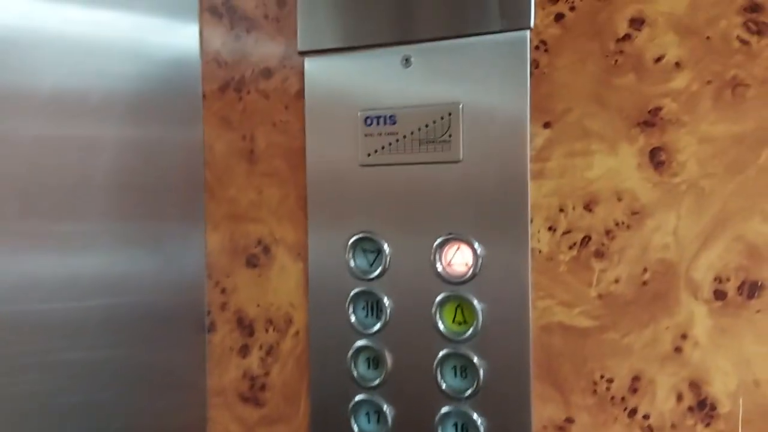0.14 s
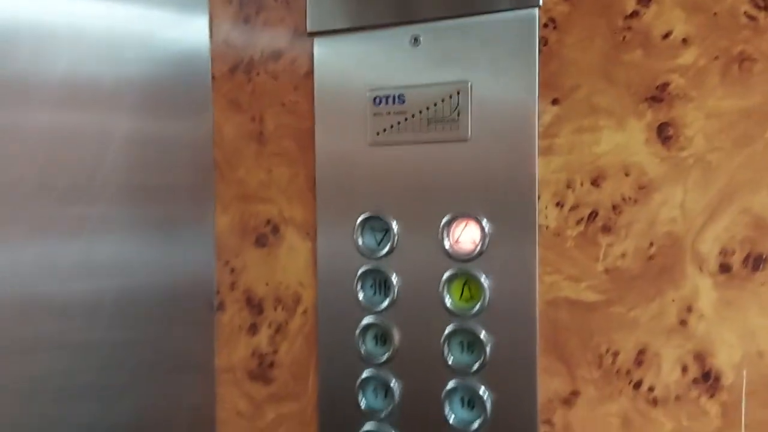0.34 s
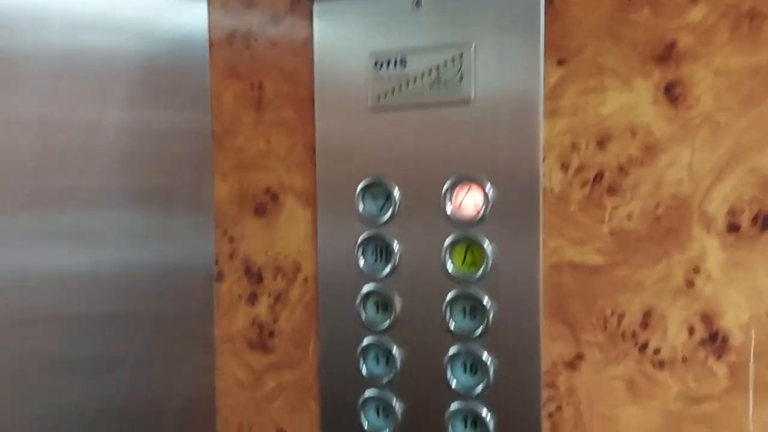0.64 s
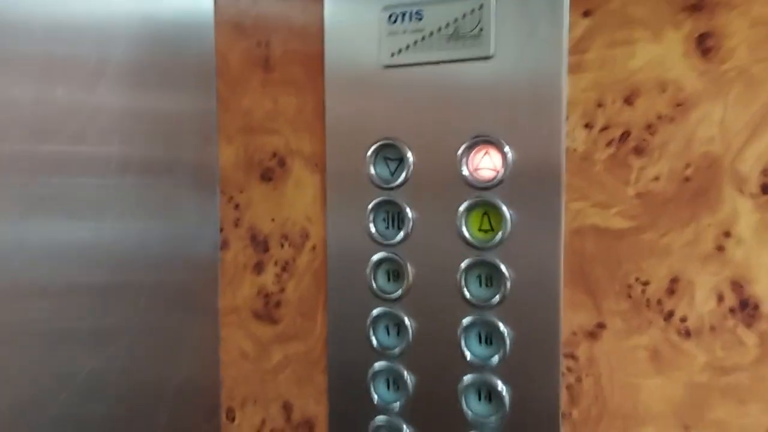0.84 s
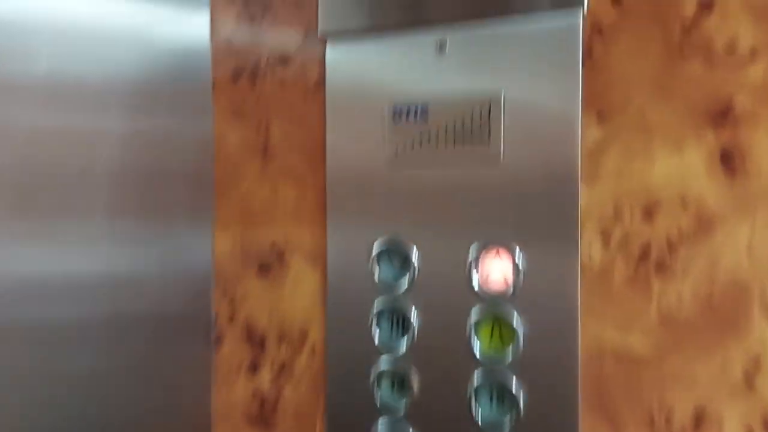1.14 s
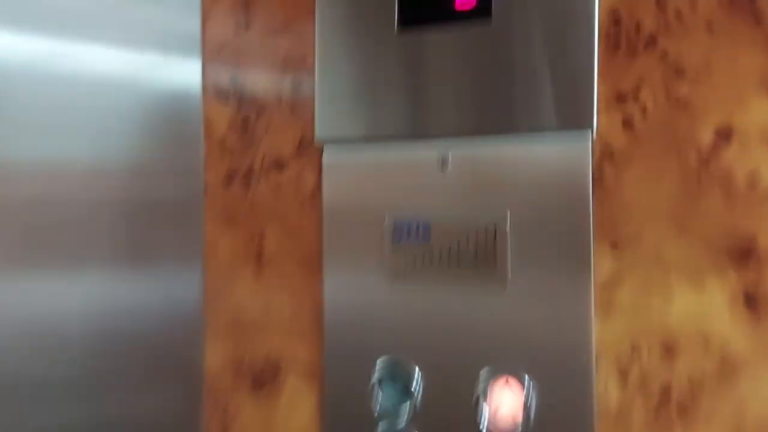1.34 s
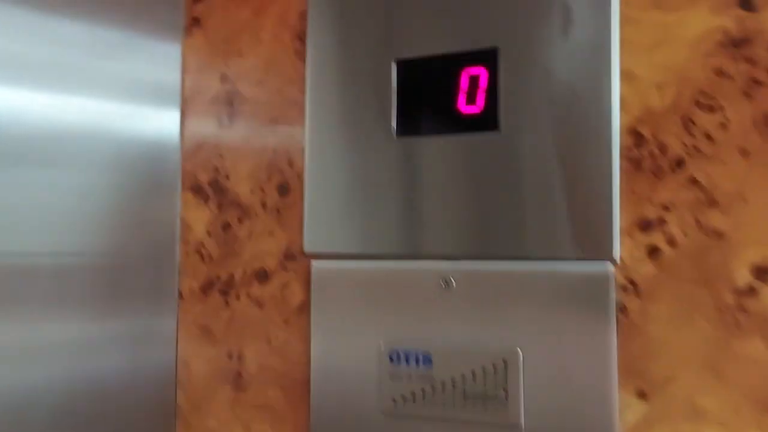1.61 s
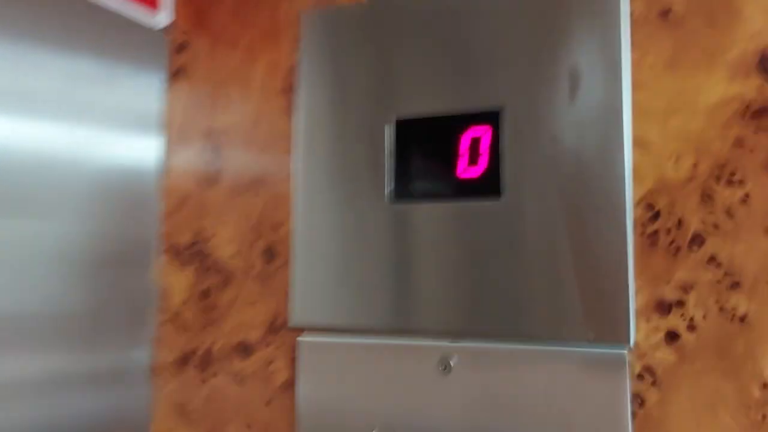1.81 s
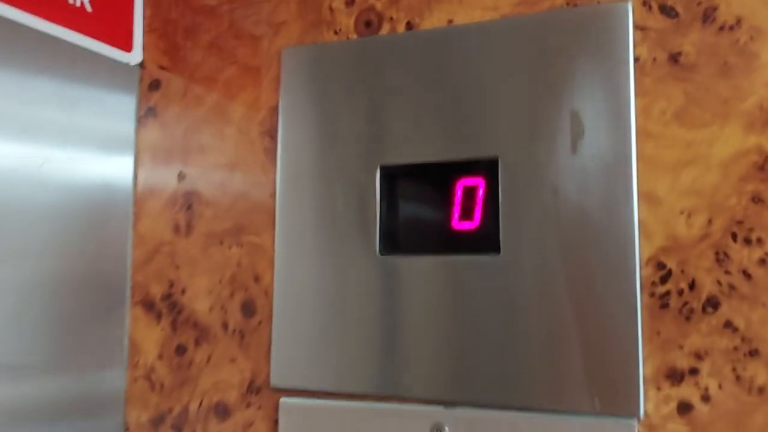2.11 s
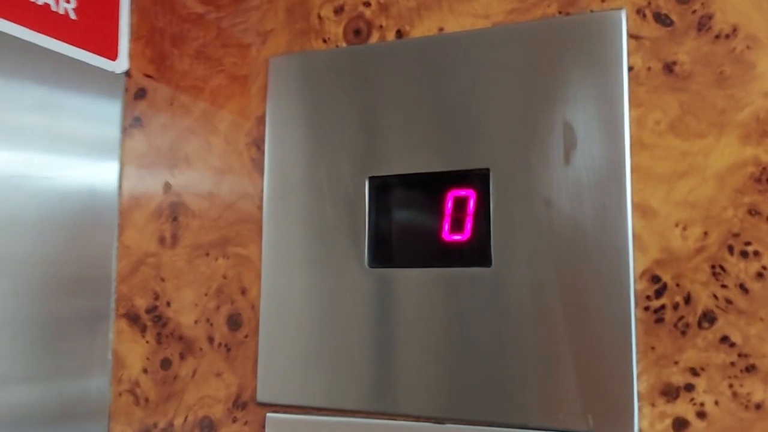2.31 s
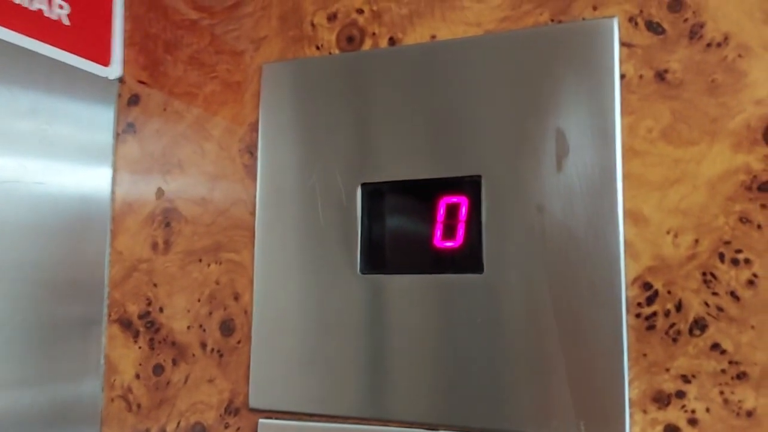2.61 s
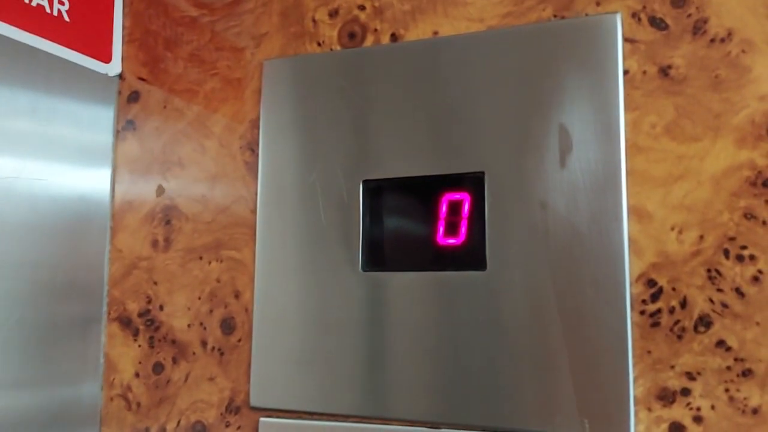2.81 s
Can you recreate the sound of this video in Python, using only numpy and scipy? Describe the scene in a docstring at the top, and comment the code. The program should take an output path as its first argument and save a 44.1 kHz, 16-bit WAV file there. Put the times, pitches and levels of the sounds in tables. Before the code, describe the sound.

Elevator starting, heard inside: strong buzzing hum stops abruptly, dull jolt and slide, then quiet deep drive tone

```python
"""Small elevator car setting off

Recorded inside the car, in stereo: a door magnet hums at twice the mains frequency and its panels buzz along.
The door gear creaks, a small metal part ticks, then the magnet cuts out as low-passed clicks jolt the cabin.
Coloured noise slides for a third of a second; a swept sine with its orders is the rising drive tone.
The guides rumble as noise through the low cabin modes; a short bright swish of noise passes later."""
import sys
import numpy as np
from scipy import signal
from scipy.io import wavfile

SR = 44100
rng = np.random.default_rng(int(sys.argv[2]) if len(sys.argv) > 2 else 0)


def master(y):
    """Save y as 16-bit WAV."""
    cut = np.clip(np.atleast_2d(y).T, -1, 1)
    pcm = np.round(cut * 32767)  # scale
    wavfile.write(sys.argv[1], SR, pcm.astype(np.int16))


def level_to_linear(level):
    """Convert decibel levels to linear amplitude factors, elementwise."""
    exponent = np.asarray(level, float) / 20
    return 10 ** exponent


N = 130095  # length in samples

# Likeness of the two microphone channels in the noises. Each row: frequency in Hz, correlation from -1 to 1.
CHANNEL_LIKENESS = [(60, 1.0), (130, 0.44), (290, 0.19), (640, 0.7), (1410, -0.5), (3100, 0.051),
                    (6820, -0.12), (15000, -0.092)]
# Lean of the noises across the stereo image. Each row: frequency in Hz, left minus right in dB.
CHANNEL_LEAN = [(60, 0.0), (130, 3), (290, -11), (640, 1.5), (1410, -6), (3100, -7), (6820, -1), (15000, 4)]
# Spectrum of the steady microphone hiss. Each row: frequency in Hz, relative density in dB per Hz.
MIC_HISS_COLOUR = [(6000, -2.5), (10000, -7.5), (14000, -10), (17000, 5)]
# Course of the treble hiss. Each row: time in seconds, level in dB.
TREBLE_LEVEL = [(0, -79.5), (0.15, -74), (0.36, -79), (0.38, -65.5), (0.56, -81.5), (0.582, -65.5),
                (0.75, -65), (0.9, -67), (1.0, -80), (1.2, -79), (1.32, -88), (1.6, -74), (1.9, -71),
                (2.05, -71.5), (2.2, -72.5), (2.36, -78), (2.85, -83.5), (2.95, -75)]
# Spectrum of the treble hiss. Each row: frequency in Hz, relative density in dB per Hz.
TREBLE_SPECTRUM = [(5000, -20.5), (6000, -4), (7500, -3.5), (9500, -3), (12000, -3), (14500, -1.5),
                   (16500, -3.5)]
# Course of the mechanism's rattle. Each row: time in seconds, level in dB.
RATTLE_LEVEL = [(0.03, -45.5), (0.12, -44.5), (0.23, -43), (0.35, -51), (0.38, -40), (0.6, -50.5),
                (0.73, -38.5), (0.78, -46), (0.82, -43.5), (1.07, -76), (1.24, -63.5), (1.3, -78.5),
                (2.19, -52.5), (2.39, -62.5), (2.71, -52.5), (2.72, -62.5), (2.93, -54.5)]
# Spectrum of the mechanism's rattle. Each row: frequency in Hz, relative density in dB per Hz.
RATTLE_SPECTRUM = [(150, -45), (250, -7.5), (327, 2), (366, -5), (545, -3.5), (775, -8), (993, -18.5),
                   (1250, -16), (1500, -22.5), (1950, -48)]
# Sudden dull bursts: small knocks and sharp onsets of the rush. Each row: start in seconds, level in dB before
# scatter.
SUDDEN_BURSTS = [(.543, -60.5), (.574, -53), (1.189, -64), (1.535, -66.5), (1.615, -60), (1.78, -59),
                 (2.024, -78), (2.753, -68)]
# Short notes of the door gear. Each row: centre in seconds, pitch there in Hz, level in dB, length in seconds.
DOOR_CREAKS = [(0.055, 870, -45, 0.04), (0.157, 1175, -49, 0.018), (0.317, 1094, -56, 0.018),
               (0.805, 1050, -50, .03)]
# A metal tick and its bounces. Each row: start in seconds, relative strength in dB.
METAL_TICKS = [(0.3655, -47), (0.386, -51), (0.409, -57)]
# Modes of the small metal part. Each row: frequency in Hz, relative level in dB, 60 dB decay in seconds.
METAL_MODES = [(6080, -5, 0.01), (8120, 2, 0.016), (9100, -6, 0.008), (9700, -5, 0.008),
               (11600, -12, 0.007), (13400, -9, .01), (14200, -10, 0.01)]
# Spectrum of the swish. Each row: frequency in Hz, relative density in dB per Hz.
SWISH_SPECTRUM = [(5500, -15.5), (6800, -4), (8500, -10), (10300, -9), (12500, -6.5), (14500, -6.5),
                  (16500, -1)]
# Sliding and air rush. Each row: time in seconds, level of the body in dB, level of the upper part in dB.
RUSH_LEVELS = [(0.06, -52.5, -72.5), (0.11, -58, -71), (0.35, -62, -68.5), (0.399, -53, -66.5),
               (0.531, -67, -69.5), (0.583, -55, -60), (0.71, -48.5, -55), (0.89, -54.5, -59.5),
               (1.02, -71.5, -74), (1.16, -70.5, -69.5), (1.2, -62, -68), (1.3, -81.5, -84.5),
               (1.5, -71.5, -73.5), (1.55, -66.5, -70.5), (1.63, -66, -73), (1.69, -65.5, -68.5),
               (1.99, -65.5, -67), (2.05, -58, -64), (2.12, -57, -58), (2.25, -59.5, -68.5),
               (2.39, -64, -76.5), (2.68, -57.5, -72), (2.768, -64, -82), (2.929, -56.5, -64)]
# Spectrum of the rush before its two parts are levelled. Each row: frequency in Hz, density in dB per Hz.
RUSH_SPECTRUM = [(900, 0), (1200, -5.5), (1430, -4), (1850, -1.5), (2250, -6.5), (2600, -11), (3100, -14.5),
                 (4500, -11), (6400, -20), (8000, -30)]
# Panels buzzing along with the magnet. Each row: frequency in Hz, width of one pass in Hz, relative level in dB.
PANEL_BUZZ = [(335, 40, -4), (770, 35, -8), (890, 40, -14), (1270, 40, -14), (2130, 90, -19)]
# Course of the magnet's hum, the last row its end. Each row: time in seconds, level in dB.
MAGNET_HUM = [(0.0, -15.5), (0.422, -17.5), (0.458, -12.5), (0.478, -21), (0.53, -55)]
# Third order of the drive shaft. Each row: time in seconds, frequency in Hz before waver, level in dB.
DRIVE_THIRD_ORDER = [(1.35, 59.93, -54), (1.56, 61.83, -41.5), (1.73, 67.54, -35.5), (1.93, 69.13, -34),
                     (2.05, 71, -36), (2.15, 72.97, -45), (2.4, 70.22, -41), (2.52, 71.34, -34),
                     (2.7, 72.65, -33), (2.74, 69.37, -39), (2.85, 71.1, -29), (2.95, 72.45, -40)]
# Other orders of the shaft. Each row: order number, level in dB once faded in, spread of its waver in dB.
DRIVE_OTHER_ORDERS = [(2, -41, 1.5), (4, -46, 2.5), (5, -53, 2.5)]
# Soft blows to the car. Each row: start in seconds, click strength in dB, hardness as a low-pass in Hz.
CAR_JOLTS = [(0.499, -29, 300), (0.535, -16.5, 100), (0.574, -28, 200), (0.592, -19, 80), (0.645, -33, 250)]
# Low modes of the cabin. Each row: frequency in Hz, gain under jolts in dB, gain under rumble in dB,
# 60 dB decay under rumble in seconds.
CABIN_MODES = [(45.4, 0.5, 2, 0.17), (71, 9, -6.5, 0.41), (95.7, -34.5, -2, 0.34), (117.2, -21, -7.5, 0.6),
               (148.9, 3, -8.5, .3), (174, -4.5, -12, 0.46), (235, -20.5, -14.5, 0.26),
               (287.8, -27, -19.5, 0.26), (490.5, 6.5, -23.5, 0.09)]
# Shaking of the modes above the lowest, before a common gain. Each row: time in seconds, level in dB.
UPPER_SHAKING = [(0.0, -45), (0.47, -41.5), (0.51, -34.5), (0.69, -38.5), (0.85, -37.5), (1.12, -57.5),
                 (1.19, -51.5), (1.24, -61), (1.85, -49.5), (2.23, -41.5), (2.42, -51), (2.46, -42.5),
                 (2.95, -43.5)]
# Shaking of the lowest mode, before that mode's own gain. Each row: time in seconds, level in dB.
LOWEST_SHAKING = [(0, -49), (0.5, -50.5), (0.6, -26.5), (0.85, -52.5), (1.09, -50.5), (1.5, -49),
                  (2.95, -57)]

OPPOSITE = np.array([[1], [-1]])  # puts a side signal into left and, inverted, into right


def rms_one(x):
    """Scale to rms 1."""
    return x / np.sqrt(np.mean(x ** 2) + 1e-20)


def in_time(rows):
    """Columns of a curve, one value per sample."""
    s, *columns = np.transpose(rows)
    return [np.interp(np.arange(N) / SR, s, c) for c in columns]


def at_hz(points, hz):
    """Read a spectrum table on a log frequency axis."""
    table_hz, values = np.transpose(points)
    return np.interp(np.log(hz), np.log(table_hz), values)


def drift(rate):
    """Random wandering of spread 1: noise through two equal low-pass poles at rate (Hz)."""
    pole = np.exp(-80 * np.pi * rate / SR)  # computed at every 40th sample
    noise = rng.standard_normal(N // 40 + 2002)
    slow = signal.lfilter([1], [1, -2 * pole, pole * pole], noise)[2000:]
    return np.interp(np.arange(N) / 40, np.arange(len(slow)), rms_one(slow))


def ring(x, hz, t60):
    """A two-pole resonance: a unit click sets a sine of height 1 ringing, down 60 dB after t60 seconds."""
    r, w = level_to_linear(-60 / (t60 * SR)), 2 * np.pi * hz / SR
    return signal.lfilter([0, np.sin(w)], [1, -2 * r * np.cos(w), r * r], x + 1e-18)


def filtered(kind, order, hz, x):
    """A Butterworth filter with its corner or corners at hz."""
    return signal.sosfilt(signal.butter(order, hz, kind, fs=SR, output="sos"), x)


def clicks(rows, spread_db):
    """One single-sample click per row, its strength scattered."""
    s, db = np.transpose(rows)
    out = np.zeros(N)
    out[(s * SR).astype(int)] = level_to_linear(db + spread_db * rng.standard_normal(len(s)))
    return out


def banded_noise(colour, patchy_db):
    """Stereo noise of rms 1 in bands of a quarter octave or less, each with its level, flicker and image."""
    out, together = 0, drift(12.0)
    (bottom, _), (top, _) = colour[0], colour[-1]
    edges = np.geomspace(bottom, min(top, 0.45 * SR), int(4 * np.log2(top / bottom)) + 2)
    white = rng.standard_normal((2, 2, N))
    for k, (low, high) in enumerate(zip(edges, edges[1:])):
        # neighbouring bands take turns at two independent noises
        mid, side = filtered("band", 2, [low, high], white[k % 2])
        hz = np.sqrt(low * high)
        alike = np.clip(at_hz(CHANNEL_LIKENESS, hz), -1, 1)
        lean = level_to_linear(at_hz(CHANNEL_LEAN, hz) / 2 * OPPOSITE)
        flicker_db = patchy_db * (together + 0.64 * drift(16.0))
        stereo = np.sqrt(1 + alike) * mid + np.sqrt(1 - alike) * side * OPPOSITE
        out = out + level_to_linear(at_hz(colour, hz) + flicker_db) * lean * stereo
    return rms_one(out)


def microphone_hiss():
    """Noise of steady mean level at -80 dB, its bands flickering a little."""
    return level_to_linear(-80) * banded_noise(MIC_HISS_COLOUR, patchy_db=1.0)


def treble_hiss():
    """High noise whose level follows a curve."""
    return level_to_linear(in_time(TREBLE_LEVEL)[0]) * banded_noise(TREBLE_SPECTRUM, patchy_db=0.6)


def mechanism_rattle():
    """Mid-range noise of the mechanism, its level following a curve."""
    return level_to_linear(in_time(RATTLE_LEVEL)[0]) * banded_noise(RATTLE_SPECTRUM, patchy_db=1.2)


def knocks():
    """Each knock is a sudden dull burst of band-passed noise that dies away."""
    t60, low_hz, high_hz = 0.29, 514, 2410  # decay in seconds, band in Hz
    strikes = clicks(SUDDEN_BURSTS, spread_db=0.5)
    dying = signal.lfilter([1], [1, -level_to_linear(-60 / (t60 * SR))], strikes)
    mid, side = filtered("band", 2, [low_hz, high_hz], rng.standard_normal((2, N)))
    return dying * rms_one(mid + 0.5 * side * OPPOSITE)


def creaks():
    """Short rough notes that swell, sag in pitch and fade."""
    sag, roughness = 0.03, 0.5  # share of pitch lost over one length; spread of the level's random part
    out = 0
    for s, hz, db, length in DOOR_CREAKS:
        u = (np.arange(N) / SR - s) / length
        swell = np.exp(-4 * u ** 2)
        rough = 1 + roughness * drift(87.0)
        cycles = hz * length * (u - sag * u ** 2 / 2) + rng.random()
        out = out + level_to_linear(db) * swell * rough * np.sin(2 * np.pi * cycles)
    return out * level_to_linear(-1.5 * OPPOSITE)  # 3 dB stronger on the right


def ticks():
    """Each touch, and a dying rattle after the first, strike the small high modes with strengths of their own."""
    rattle_per_s, rattle_db, rattle_t60 = 1200, -63, 0.25  # mean rate, starting strength, decay in seconds
    t = np.arange(N) / SR - METAL_TICKS[0][0]
    hits = (rng.random(N) < rattle_per_s / SR) * (t > 0)
    rattle = hits * level_to_linear(rattle_db - 60 * np.clip(t, 0, 1) / rattle_t60)
    out = 0
    for hz, db, t60 in METAL_MODES:
        strikes = clicks(METAL_TICKS, spread_db=3.5) / 2 + rattle * rng.standard_normal(N)
        out = out + level_to_linear(db) * ring(strikes, hz, t60)
    return out * level_to_linear(1.5 * OPPOSITE)  # 3 dB stronger on the left


def swish():
    """Bright noise with a quick attack, a hold and a dying tail."""
    start_s, attack_s, hold_s, t60 = 2.078, 0.025, 0.075, 0.22  # the hold counts from the start
    t = np.arange(N) / SR - start_s
    attack = np.clip(t / attack_s, 0, 1) ** 2
    tail = level_to_linear(-60 * np.clip(t - hold_s, 0, 1) / t60)
    return level_to_linear(-59) * attack * tail * banded_noise(SWISH_SPECTRUM, patchy_db=1.5)


def rush():
    """Sliding and air: coloured noise whose body and upper part swell separately, with a fast scraping grain."""
    split_hz, grain_db = 2670, 1.5
    noise = banded_noise(RUSH_SPECTRUM, patchy_db=1.0) * level_to_linear(grain_db * drift(60.0))
    body_db, upper_db = in_time(RUSH_LEVELS)
    body = rms_one(filtered("low", 4, split_hz, noise))
    upper = rms_one(filtered("high", 4, split_hz, noise))
    return level_to_linear(body_db) * body + level_to_linear(upper_db) * upper


def buzz():
    """Noise twice through narrow panel resonances that flicker, while the magnet is on."""
    end_s, fade_s, flicker_db = 0.53, 0.1, 2.0
    out = 0
    for hz, width, db in PANEL_BUZZ:
        t60 = np.log(1000) / np.pi / width
        mid, side = [rms_one(ring(ring(v, hz, t60), hz, t60)) for v in rng.standard_normal((2, N))]
        out = out + level_to_linear(db + flicker_db * drift(12.0)) * (mid + 0.7 * side * OPPOSITE)
    on = np.clip((end_s - np.arange(N) / SR) / fade_s, 0, 1)
    return level_to_linear(-48) * on * out


def hum():
    """A near-pure tone at twice the mains frequency, with a faint octave, that dies when the magnet drops."""
    hum_hz, octave_db = 99.8, -38  # the octave is relative to the tone
    t = np.arange(N) / SR
    turn = 2 * np.pi * hum_hz * t
    on = np.clip((MAGNET_HUM[-1][0] - t) / 0.02, 0, 1)
    tone = np.cos(turn) + level_to_linear(octave_db) * np.cos(2 * turn)
    return -np.sqrt(2) * level_to_linear(in_time(MAGNET_HUM)[0]) * on * tone


def drive():
    """The shaft's third order leads, its pitch following a curve; other orders fade in and waver on their own."""
    waver_hz, waver_db = 0.44, 0.5  # spreads of the third order's wavering
    fade_in_s, run_up_s = 0.066, 0.44  # the third order's fade ends where the run-up of the others begins
    hz, db = in_time(DRIVE_THIRD_ORDER)
    t = np.arange(N) / SR - DRIVE_THIRD_ORDER[0][0]
    shaft_turn = 2 * np.pi * np.cumsum(hz + waver_hz * drift(2.6)) / SR / 3
    third = np.clip(t / fade_in_s + 1, 0, 1) * level_to_linear(db + waver_db * drift(5.4)) * np.sin(3 * shaft_turn)
    others = 0
    for order, level, waver in DRIVE_OTHER_ORDERS:
        phase = 2 * np.pi * rng.random()
        others = others + level_to_linear(level + waver * drift(5.9)) * np.sin(order * shaft_turn + phase)
    return np.sqrt(2) * (third + np.clip(t / run_up_s, 0, 1) ** 2 * others)


def cabin_jolts():
    """Clicks softened by a low-pass ring the cabin modes, which die faster than under the rumble."""
    push = 0
    for s, db, hz in CAR_JOLTS:
        soften = signal.bessel(4, hz, norm="mag", fs=SR, output="sos")
        push = push + signal.sosfilt(soften, clicks([(s, db)], spread_db=1))
    return sum(level_to_linear(db) * ring(push, hz, 0.27 * t60) for hz, db, _, t60 in CABIN_MODES)


def cabin_rumble():
    """Noise shakes the cabin modes; the higher the mode, the more it differs between the channels."""
    upper_gain_db, side_db = 4.5, -10.5  # side_db is the channel difference of a mode at 250 Hz
    modes = []
    for hz, _, db, t60 in CABIN_MODES:
        mid, side = [rms_one(ring(v, hz, t60)) for v in rng.standard_normal((2, N))]
        modes.append(level_to_linear(db) * (mid + level_to_linear(side_db) * (hz / 250) ** 2 * side * OPPOSITE))
    lowest, *upper = modes
    upper_shaking = level_to_linear(in_time(UPPER_SHAKING)[0] + upper_gain_db) * rms_one(sum(upper))
    return upper_shaking + level_to_linear(in_time(LOWEST_SHAKING)[0]) * lowest


def scene():
    """All sources inside the car; the bass leans slightly to the left."""
    background = microphone_hiss() + treble_hiss() + mechanism_rattle()
    details = knocks() + creaks() + ticks() + swish() + rush() + buzz()
    bass = (hum() + drive() + cabin_jolts() + cabin_rumble()) * level_to_linear(0.15 * OPPOSITE)
    return background + details + bass


def low_pass(x):
    """Removes everything above the highest recorded frequency."""
    return signal.sosfilt(signal.butter(12, 15760, fs=SR, output="sos"), x)


def record(dry):
    """The microphone loses the deepest bass, and a steep low-pass cuts the top."""
    no_deep_bass = filtered("high", 4, 39.65, dry)
    top_cut = signal.cheby2(14, 60, 16300, fs=SR, output="sos")  # 60 dB down from 16300 Hz
    mix = signal.sosfilt(top_cut, no_deep_bass)
    return low_pass(mix)


dry = scene()
out = record(dry)
master(out)
```